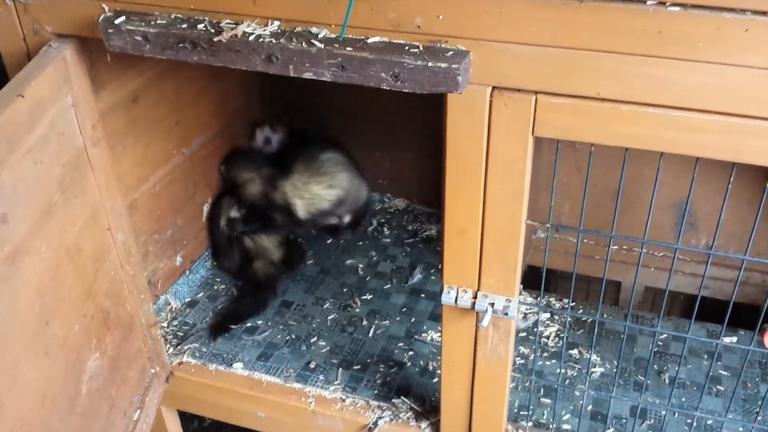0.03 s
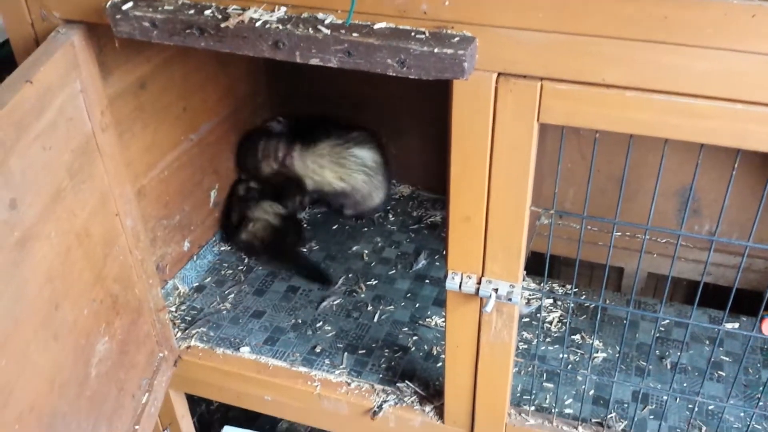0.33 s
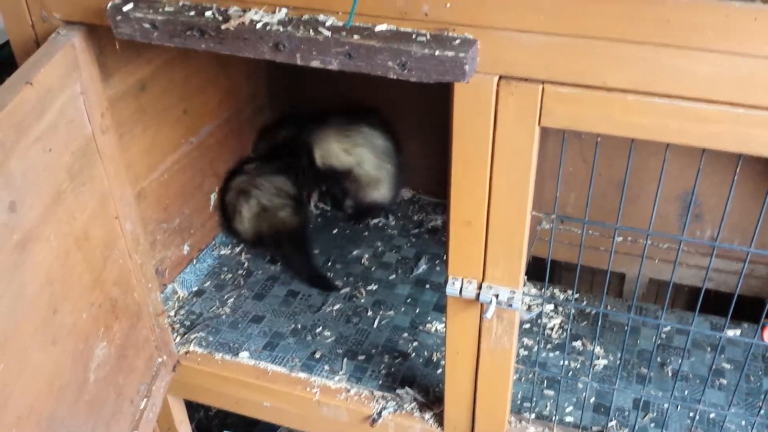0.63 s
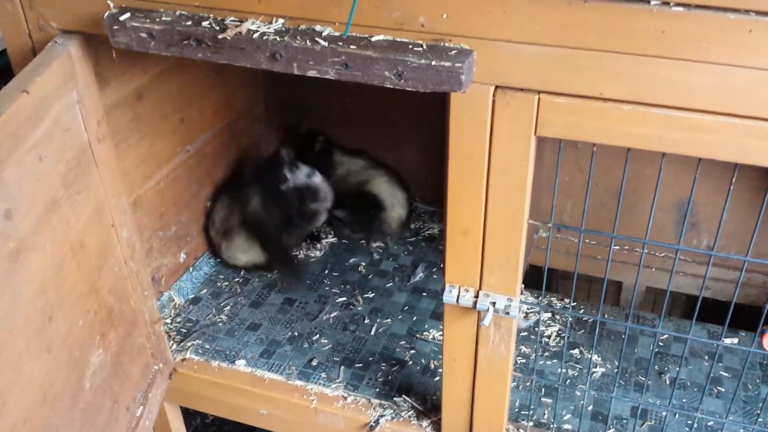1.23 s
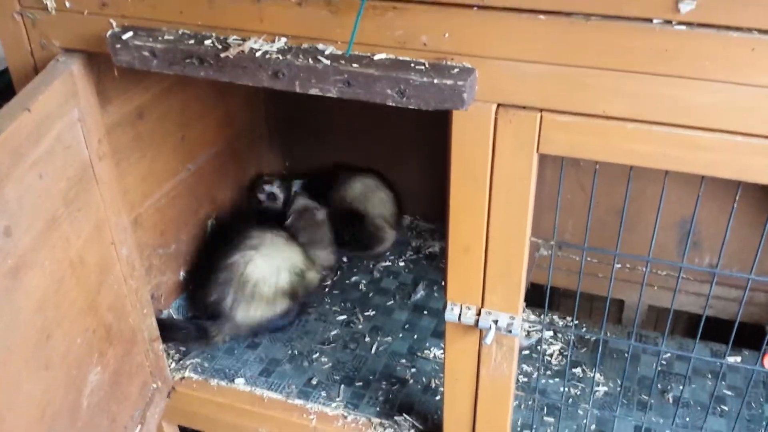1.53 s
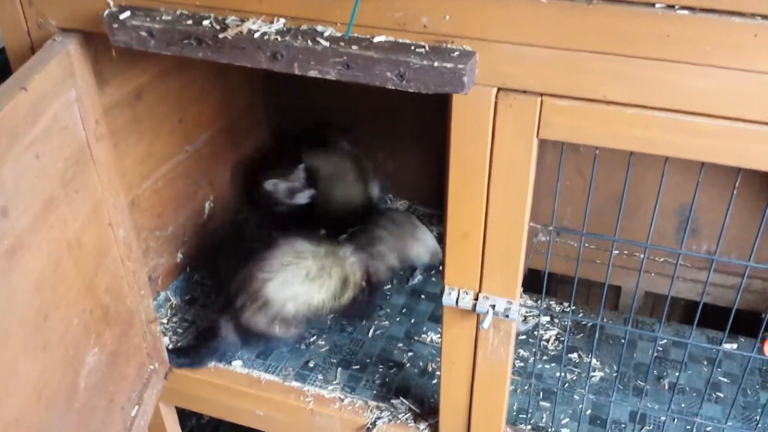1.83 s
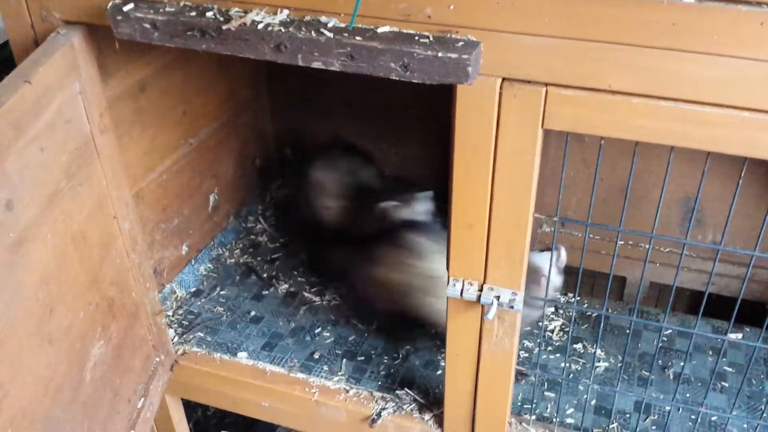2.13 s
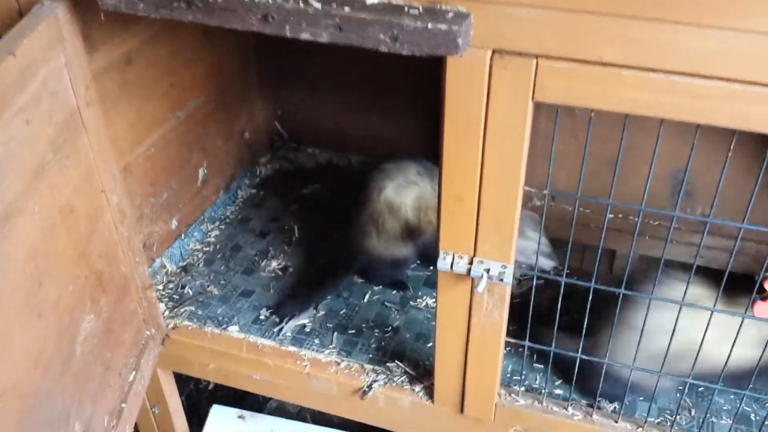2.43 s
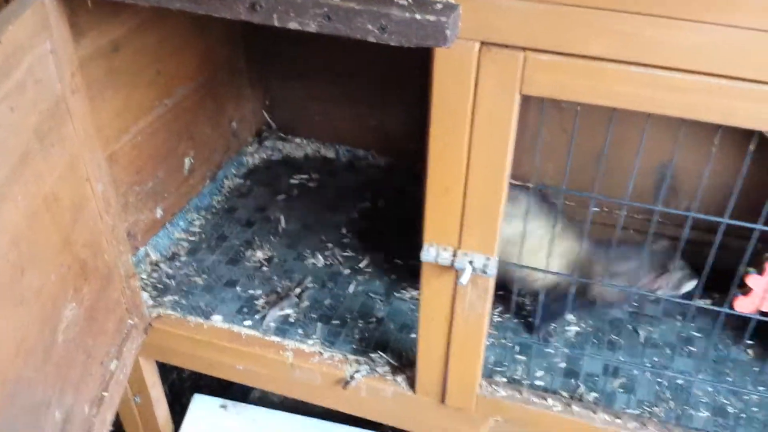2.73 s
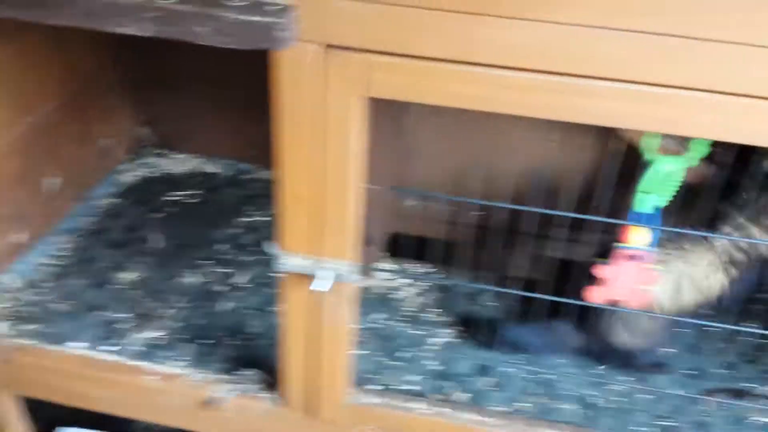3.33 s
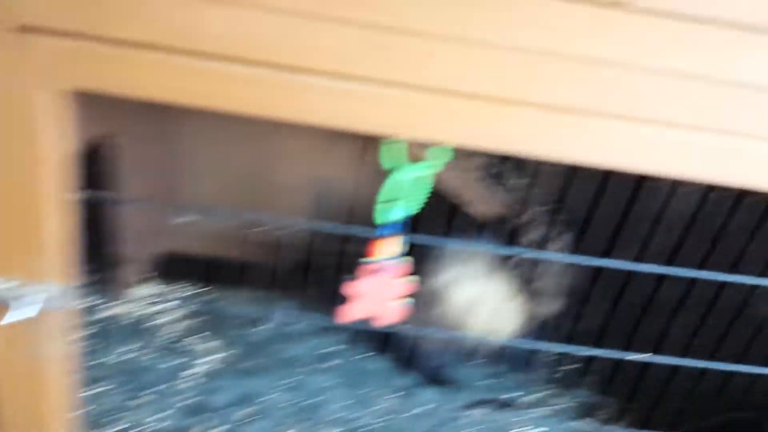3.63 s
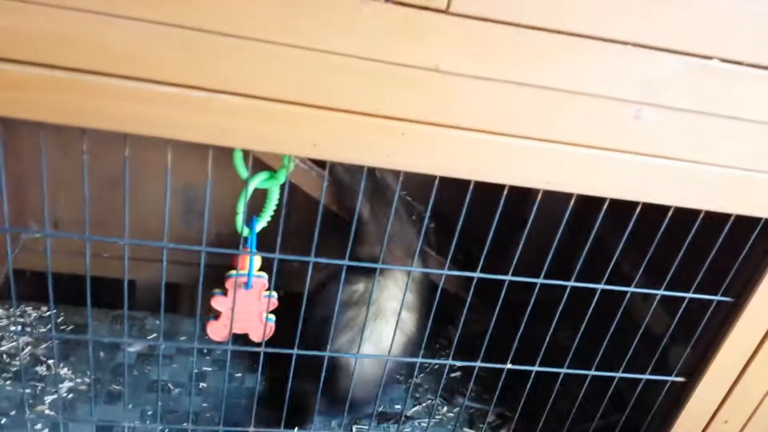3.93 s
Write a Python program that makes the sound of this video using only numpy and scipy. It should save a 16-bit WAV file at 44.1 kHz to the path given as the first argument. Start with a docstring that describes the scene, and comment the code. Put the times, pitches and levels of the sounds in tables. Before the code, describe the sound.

Small animals scratch and rustle around an outdoor hutch, quietly at first, with a few short clucks and squeaks. Halfway through they break into a run, bringing louder, close scrapes, sharp snaps and hollow knocks on wood.

```python
"""In a wooden hutch outdoors, two ferrets wrestle, then bolt along it past a close microphone.
Claws strike and drag on the vinyl floor and shavings rustle, all sources of friction noise. Bodies
excite the modes of the boards and of a loose panel, and the wire mesh pings once. The animals cluck
and squeak (pulses filtered by the throat) and hiss. Reflections in the small box add a short ring
over a faint outdoor background."""
import sys
import numpy as np
from scipy import signal
from scipy.fft import rfft, irfft, next_fast_len
from scipy.io import wavfile
from scipy.ndimage import uniform_filter1d

SR = 44100
rng = np.random.default_rng(int(sys.argv[2]) if len(sys.argv) > 2 else 0)


def master_out(mix):
    """Clip the mix to full scale and print it as 16-bit PCM to the path in sys.argv[1]."""
    frames = np.transpose(np.atleast_2d(mix))
    ceiling = np.clip(frames, -1, 1)
    pcm = np.round(ceiling * 32767).astype(np.int16)
    wavfile.write(sys.argv[1], SR, pcm)


N = 176400  # 4 s
BOX_DB = 1.5  # reflected over direct level for claws and wire
JUDDER_HZ = 248  # rate of irregularity in a sliding claw

# modes of the boards: f/Hz, level/dB, T60/s
BOARD_MODES = [(106.4,-5,0.17),(130,-4,0.13),(169.8,-3,0.13),(202.8,0,0.099),(267.6,2.5,0.041),(370,-7,0.056),(485.4,7,0.02),(582,-3.5,0.074),(670,-2,0.035),(808,-6,0.072),(1016,0,0.082)]
# spectrum of claws on vinyl: f/Hz, level/dB
SCRATCH_SPECTRUM = [(200,-17.5),(600,-7.5),(1400,-9),(2600,-3.5),(3600,-6),(4600,-1.5),(5500,-0.5),(6300,2.5),(7400,-5.5),(11000,-11.5),(15000,-24.5)]
# spectrum of a dry snap: f/Hz, level/dB
SNAP_SPECTRUM = [(500,-2),(2000,-1),(6000,15),(8000,3),(15000,3)]

def undb(db):
    """Level to amplitude ratio."""
    return 10 ** (np.asarray(db) / 20)

def unit(x):
    """Normalise to rms 1."""
    return x / np.sqrt(np.mean(x ** 2) + 1e-18)

def loudest(x):
    """Normalise the loudest 6 ms to rms 1."""
    return x / np.sqrt(uniform_filter1d(x ** 2, size=260).max())

def butter(x, order, hz, kind="low"):
    """Causal Butterworth filter."""
    return signal.sosfilt(signal.butter(order, hz, kind, fs=SR, output="sos"), x)

def colour(x, spectrum, tilt_db=0, knee_hz=1000):
    """Minimum-phase filter through (f/Hz, level/dB) points, tilted per octave above the knee."""
    hz, db = np.array(spectrum, float).T
    n = next_fast_len(len(x) + 4096) // 2 * 2
    f = np.maximum(np.fft.rfftfreq(n, 1 / SR), 1)
    curve = np.interp(np.log(f), np.log(hz), db) + tilt_db * np.log2(np.maximum(f, knee_hz) / 6000)
    cepstrum = irfft(np.log(undb(curve)))
    cepstrum[1:n // 2] *= 2
    cepstrum[n // 2 + 1:] = 0
    return irfft(rfft(x, n) * np.exp(rfft(cepstrum)))[:len(x)]

def add(out, start, x):
    """Superpose x on out from its start time."""
    i = max(int(start * SR), 0)
    n = min(x.shape[-1], N - i)
    if n > 0:
        out[..., i:i + n] += x[..., :n]

def pan(db):
    """Gains for an interaural level difference, left minus right."""
    return undb(np.array([[db], [-db]]) / 2)

def walk(rate, n):
    """Random modulation: Gaussian values, rate per second, joined by lines."""
    steps = np.arange(n) * rate / SR
    return np.interp(steps, np.arange(n), rng.standard_normal(n))

def swell(length):
    """Half-sine envelope."""
    return np.sin(np.linspace(0, np.pi, int(length * SR))).clip(0)

def ring(modes):
    """Impulse response as a sum of damped modes."""
    t = np.arange(SR // 2) / SR
    return sum(undb(db) * np.cos(2 * np.pi * hz * t) * np.exp(-np.log(1000) * t / t60)
               for hz, db, t60 in modes)

def hutch(x, wet_db, t60=0.064):
    """Reverberation: direct sound plus diffuse reflections, different for each ear and source."""
    t = np.arange(SR // 5) / SR
    walls = rng.standard_normal((2, len(t))) * np.exp(-np.log(1000) * t / t60)
    walls /= np.sqrt((walls ** 2).sum(axis=1, keepdims=True))
    direct = x * np.ones((2, 1))
    reflected = signal.fftconvolve(direct, walls, axes=1)[:, :direct.shape[1]]
    return (direct + undb(wet_db) * reflected) / np.sqrt(1 + undb(wet_db) ** 2)

def friction(envelope, spectrum, tilt_db=0, knee_hz=1000, shared=0.22):
    """Granular friction noise, weakly coherent: it reaches the ears mostly by different paths."""
    n = len(envelope)
    grains = envelope * undb(2.5 * walk(2000, n).clip(-2, 2))
    direct = shared * rng.standard_normal(n)
    paths = direct + np.sqrt(1 - shared ** 2) * rng.standard_normal((2, n))
    return np.array([colour(grains * path, spectrum, tilt_db, knee_hz) for path in paths])

def air():
    """Faint outdoor ambient noise, almost coherent at the two ears."""
    # background spectrum: f/Hz, level/dB
    spectrum = [(20,-13),(55,-0.5),(105,6.5),(200,-22.5),(550,-13),(1400,-24),(6000,-17),(15000,-28)]
    mid, side = (unit(colour(rng.standard_normal(N), spectrum)) for _ in range(2))
    return undb(-51.5) * (mid + 0.13 * side * np.array([[1], [-1]]))

def crackle(snaps_per_s=27):
    """Shavings snap underfoot as a Poisson process, mostly faint, a few distinct."""
    snaps = (rng.random(N) < snaps_per_s / SR) * rng.standard_normal(N).clip(-2, 2)
    left = rng.random(N)
    return unit(np.array([colour(snaps * share, SNAP_SPECTRUM) for share in (left, 1 - left)]))

def shavings():
    """Friction of fur and feet rustles the shavings; soft steps drive the modes of the boards."""
    # restlessness of the animals: t/s, level/dB
    activity = [(0,-38.5),(.17,-43.5),(.24,-47.5),(.32,-41.5),(.39,-54),(.47,-47),(.64,-46.5),(.9,-42.5),(1.13,-48.5),(1.36,-48),(1.55,-39),(1.85,-41),
                (2.1,-34.5),(2.175,-40),(2.27,-35.5),(2.45,-35.5),(2.6,-35),(2.76,-41.5),(2.82,-34.5),(3,-33.5),(3.12,-39.5),(3.24,-31),(3.321,-39.5),(3.44,-32.5),(3.72,-38),(3.91,-41),(4,-33)]
    # rustle spectrum: f/Hz, level/dB
    spectrum = [(150,-22.5),(550,-5.5),(1400,-5.5),(2700,-3.5),(3600,-5.5),(6300,-0.5),(7600,-7),(11000,-9.5),(15000,-18.5)]
    stir = undb(np.interp(np.arange(N) / SR, *np.array(activity).T))
    flutter = undb(3.5 * walk(55, N))
    rustle = unit(friction(flutter, spectrum)) + undb(-23.5) * crackle()
    steps = rng.standard_normal(N) * undb(4 * walk(40, N).clip(-2, 1))
    force = butter(steps, 2, [99, 756], "band")
    patter = unit(signal.fftconvolve(force, ring(BOARD_MODES))[:N])
    return rustle * stir * pan(3.5), patter * stir * undb(-5)

def hisses():
    """Turbulent breath: brief swells of broadband noise."""
    # hisses: t/s, duration/s, level/dB
    breaths = [(0.475,0.092,-47),(0.914,0.065,-37)]
    # hiss spectrum: f/Hz, level/dB
    spectrum = [(500,-31),(1500,-7.5),(2000,-1.5),(2800,1.5),(4000,-4.5),(7000,-11),(14000,-18)]
    out = np.zeros(N)
    for start, length, db in breaths:
        shape = swell(length)
        breath = unit(colour(rng.standard_normal(SR // 4), spectrum))[:len(shape)]
        add(out, start, undb(db) * shape * breath)
    return out

def clucks(jitter=0.13, breathiness=0.87):
    """Source and filter: gliding, uneven pulses and breath noise are shaped by the throat."""
    # clucks and squeaks: t/s, duration/s, level/dB, first f/Hz, last f/Hz, rasp (0-1), cut-off f/Hz
    calls = [(.353,.026,-37,780,735,.35,1430),(1.307,.037,-35.5,240,262,.3,1100),(1.431,.036,-34.5,270,262,.7,1050),(1.511,.038,-35.5,255,285,.4,950),
             (1.604,.022,-27.5,440,410,.5,1200),(2.686,.04,-31.5,560,440,.8,800),(2.954,.036,-27.5,760,640,1,1050),(3.078,.022,-24.5,560,500,.8,1400)]
    # throat response: f/Hz, level/dB
    throat = [(120,-8.5),(250,2.5),(520,2.5),(1080,-2.5),(1500,-0.5),(5000,-34)]
    out = np.zeros(N)
    for start, length, db, first_hz, last_hz, rasp, top_hz in calls:
        shape = swell(length) ** 0.17  # abrupt edges
        n = len(shape)
        hz = np.geomspace(first_hz, last_hz, n) * (1 + jitter * rasp * walk(365, SR // 8)[:n])
        phase = 2 * np.pi * np.cumsum(hz) / SR
        pulses = unit(colour(sum(np.cos(k * phase) for k in range(1, 12)), throat))
        breath = unit(colour(rng.standard_normal(SR // 8), throat))[:n]
        call = (pulses + breathiness * rasp * breath) * shape * np.linspace(1, .5, n)
        add(out, start, undb(db) * loudest(butter(np.pad(call, (0, n)), 6, top_hz)))
    return out

def wire(start=2.539, db=-28):
    """Free vibration of a brushed wire in the mesh door, to the left."""
    # wire modes: f/Hz, level/dB, T60/s
    modes = [(2500,2,0.03),(5350,-7,0.08)]
    out = np.zeros(N)
    add(out, start, undb(db) * loudest(ring(modes)))
    return hutch(out, BOX_DB) * pan(19)

def ticks(decay_s=0.00024):
    """Impulsive dry snaps, so near that only direct sound is heard."""
    # snaps: t/s, peak level/dB
    snaps = [(2.0465,-9),(2.3492,-9),(3.132,-10.5),(3.144,-9),(3.683,-21),(3.8175,-10)]
    out, t = np.zeros(N), np.arange(SR // 100) / SR
    for start, db in snaps:
        snap = colour(rng.standard_normal(len(t)) * np.exp(-t / decay_s), SNAP_SPECTRUM)
        add(out, start, undb(db) * snap / abs(snap).max())
    return out

def thumps(rub=0.14, rub_s=.014):
    """Impact excitation of the boards: the softer the contact, the lower its cut-off."""
    # blows of bodies and feet: t/s, level/dB, contact cut-off f/Hz
    blows = [(0.035,-36.5,220),(1.296,-32.5,190),(1.79,-28,377),(1.992,-31,302),(2.05,-30.5,440),(2.233,-25.5,255),(2.253,-40,200),
             (2.421,-22.5,750),(2.455,-29,900),(2.486,-26.5,875),(2.539,-28.5,770),(2.69,-32.5,200),(2.829,-24.5,303),(3.097,-26.5,383),(3.234,-32,450),
             (3.359,-28,262),(3.49,-34,260),(3.525,-26.5,445),(3.648,-29,297),(3.758,-30,368),(3.881,-31.5,232),(3.938,-34,204)]
    out, t, boards = np.zeros(N), np.arange(SR // 3) / SR, ring(BOARD_MODES)
    for start, db, contact_hz in blows:
        push = rub * rng.standard_normal(len(t)) * np.exp(-t / rub_s)
        push[0] += 1  # the impact itself
        push = butter(push, 2, contact_hz)
        push = butter(push, 2, 71, "high")  # small boards radiate little deep bass
        add(out, start, undb(db) * loudest(signal.fftconvolve(push, boards)))
    return out

def panel(sag_per_s=0.154, chatter_hz=119, chatter_s=.16, chatter_db=-28):
    """Damped modes of a loose panel hit by a body; at the first knock it chatters in its frame."""
    # knocks: t/s, level/dB, time constant of damping by the body/s
    knocks = [(2.425,-18,0.075),(2.545,-34,0.028),(2.83,-21,0.007)]
    # panel modes: f/Hz, level/dB, T60/s
    panel_modes = [(300.2,10,0.59),(252,-3,0.099),(467,-8,0.12),(593,-9,0.25),(760,-28,0.19),(1038,-6.5,0.2)]
    out, t, response = np.zeros(N), np.arange(SR // 2) / SR, ring(panel_modes)
    def sag(x):
        """Pitch and level modulation: the note buzzes and falls as the weight comes off."""
        speed = 1 - sag_per_s * t + 0.024 * walk(chatter_hz, len(t))
        buzz = undb(walk(chatter_hz, len(t)))
        return np.interp(np.cumsum(speed), np.arange(len(x)), x) * buzz
    attack = 1 - np.exp(-t / 0.0023)
    for start, db, damp_s in knocks:
        add(out, start, undb(db) * loudest(sag(response * np.exp(-t / damp_s) * attack)))
    n = int(chatter_s * SR)
    contacts = rng.standard_normal(n) * np.linspace(1, .5, n)
    chatter = sag(signal.fftconvolve(contacts, response * np.exp(-t / 0.0093)))
    add(out, knocks[0][0], undb(chatter_db) * chatter / chatter[:n].std())
    return out

def scuffs():
    """Stick-slip friction of paws dragging over the floor."""
    # drags: t/s, duration/s, level/dB, tilt/(dB per octave), left minus right/dB
    drags = [(0.67,0.12,-36.5,-7.5,2),(1.599,0.14,-36,2.5,4),(2.142,0.027,-26,7,2),(0.413,0.065,-42,-7.5,4.5),(2.275,0.13,-25,5,3.5),(2.825,0.13,-30,9.5,1),(2.909,0.11,-27,-0.5,1),
             (3.215,0.057,-26.5,4,3.5),(3.505,0.052,-25.5,4.5,7),(3.577,0.036,-27.5,-4.5,2.5),(3.604,0.047,-22.5,4.5,2)]
    out = np.zeros((2, N))
    for start, length, db, tilt_db, pan_db in drags:
        shape = swell(length)
        slips = undb(2.6 * walk(134, len(shape)))
        drag = unit(friction(slips, SCRATCH_SPECTRUM, tilt_db, knee_hz=720))
        add(out, start, pan(pan_db) * undb(db) * shape * drag)
    return out

def claws(attack_s=0.00047, crack_s=0.003):
    """Impact, then sliding friction: a claw catches with a crack and judders to a stop."""
    # strikes: t/s, level/dB, decay time/s, tilt/(dB per octave), left minus right/dB
    strikes = [(.047,-29,0.027,-2,3.5),(0.141,-28,0.032,-3,5),(1.071,-34.5,0.012,4.5,2),(1.382,-37.5,0.078,7.5,2),(1.492,-38.5,0.01,-10.5,7),
               (1.781,-29.5,0.029,8.5,4),(1.808,-29,0.022,-1.5,3),(1.982,-26.5,0.003,11,1),(2.045,-17.5,0.029,13,1.5),
               (2.1841,-25.5,0.067,6.5,4.5),(2.421,-14,0.012,1,1.5),
               (2.538,-24.5,0.015,-5,8.5),(2.659,-29,0.0071,7,1),(2.784,-19.5,0.014,13.5,2.5),(2.827,-22.5,0.0058,-27,7),
               (3.5,-19.5,0.031,0.5,2),(3.682,-29,0.011,8,0),(3.744,-21,0.023,3.5,3.5),(3.771,-20,0.0056,3,3),
               (3.816,-17.5,0.02,4.5,2.5),(3.85,-25.5,0.01,5,6),(3.941,-15,0.0085,11,6),(3.974,-23.5,0.012,3.5,2.5)]
    out, t = np.zeros((2, N)), np.arange(SR // 5) / SR
    attack = 1 - np.exp(-t / attack_s)
    crack = 0.54 * np.exp(-t / crack_s)
    for start, db, decay_s, tilt_db, pan_db in strikes:
        judder = undb(2.5 * walk(JUDDER_HZ, len(t)).clip(-2, 2))
        envelope = attack * (judder * np.exp(-t / decay_s) + crack)
        skid = friction(envelope, SCRATCH_SPECTRUM, tilt_db, knee_hz=2010)
        add(out, start, pan(pan_db) * undb(db) * loudest(hutch(skid, BOX_DB)))
    return out

def scene():
    """Superposition: claws and calls scatter off the walls; the boards radiate almost as one."""
    rustle, patter = shavings()
    bright = claws() + scuffs() + rustle + wire() + hutch(hisses(), wet_db=3) * pan(13.7)
    wood = hutch(thumps() + panel() + patter, wet_db=-12.5) * pan(0.33)
    return bright + wood + hutch(clucks(), wet_db=-3) + ticks() + air()

def record(dry):
    """Band limiting: a steep elliptic low-pass at 15.7 kHz."""
    return signal.sosfilt(signal.ellip(8, .2, 70, 15700, fs=SR, output="sos"), dry)

dry = scene()
out = record(dry)
master_out(out)
```